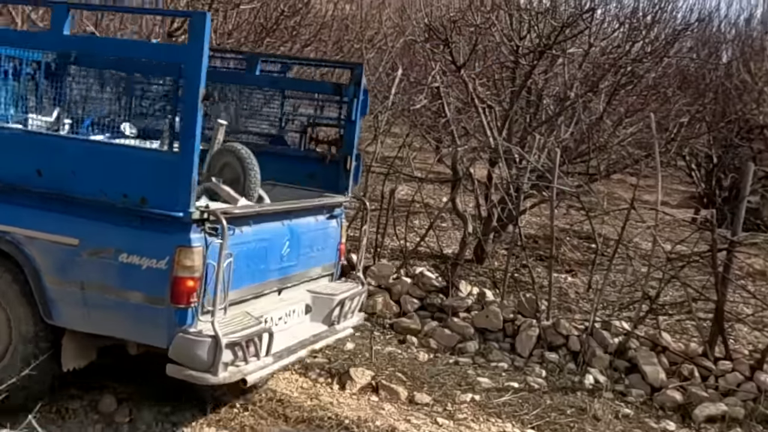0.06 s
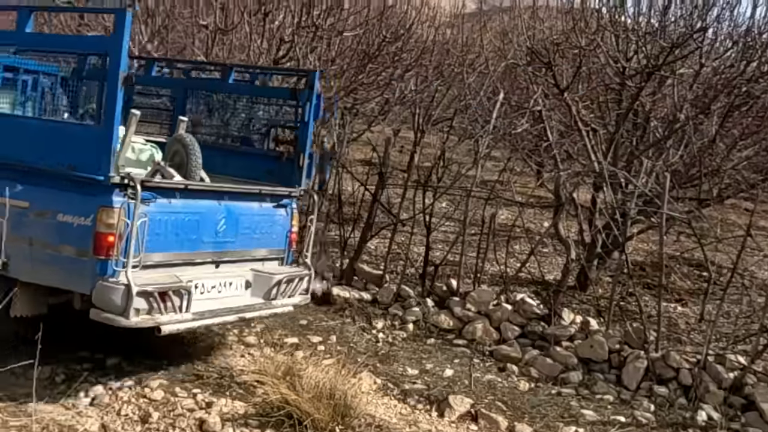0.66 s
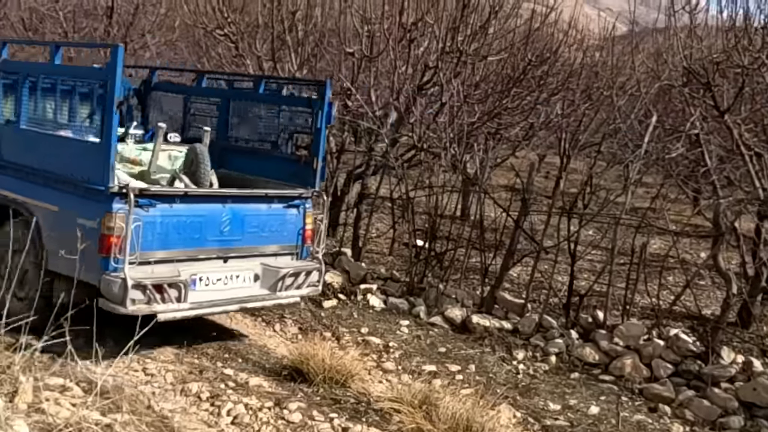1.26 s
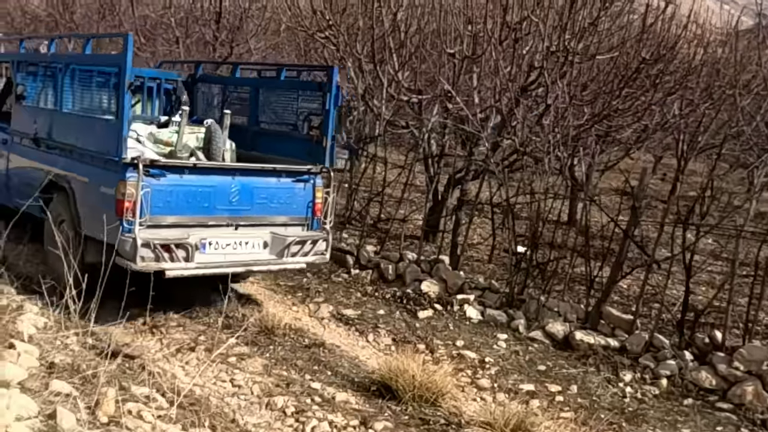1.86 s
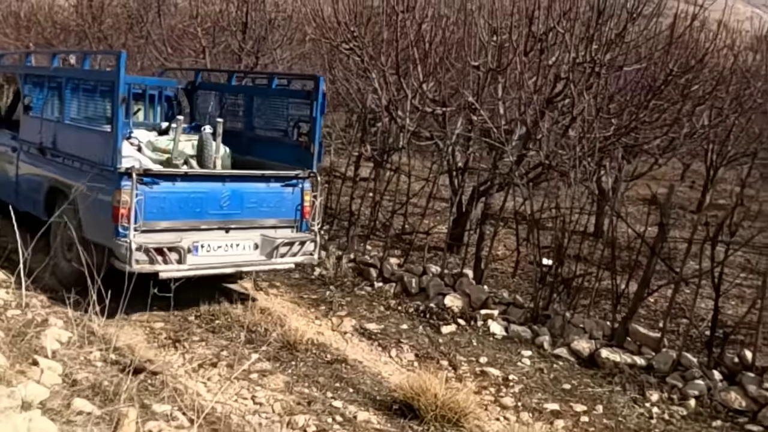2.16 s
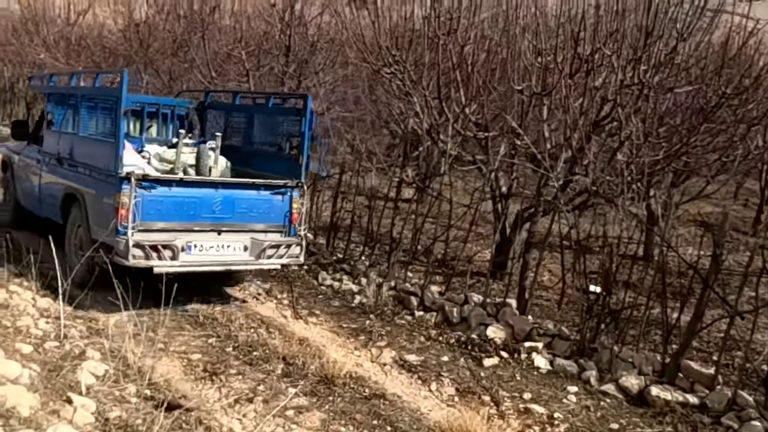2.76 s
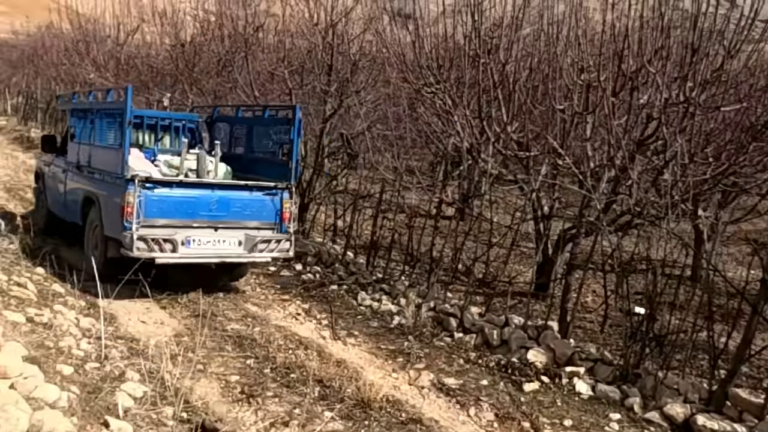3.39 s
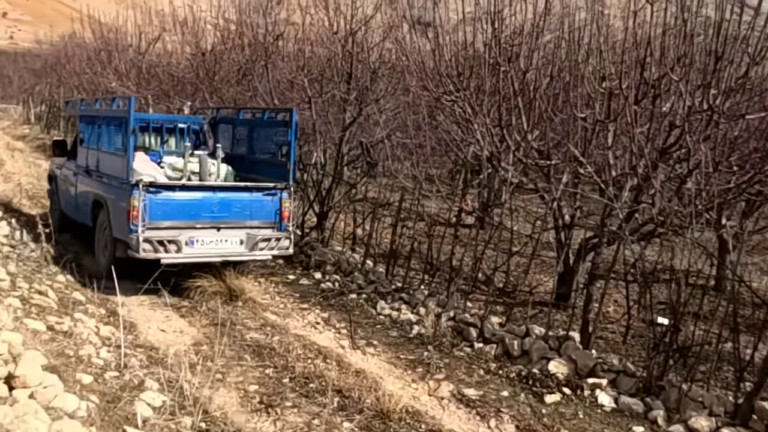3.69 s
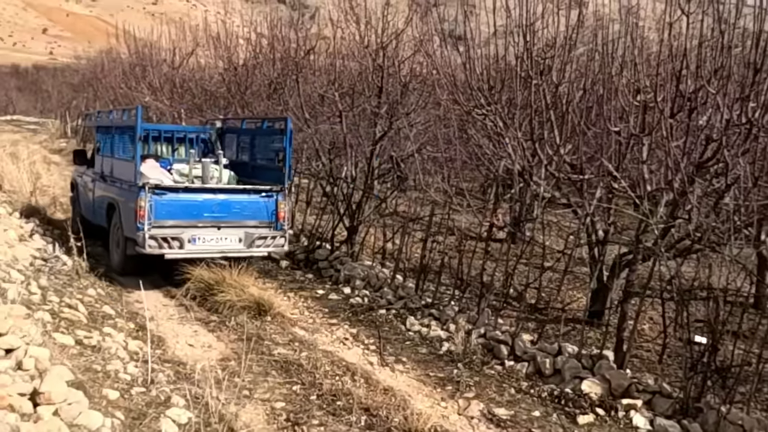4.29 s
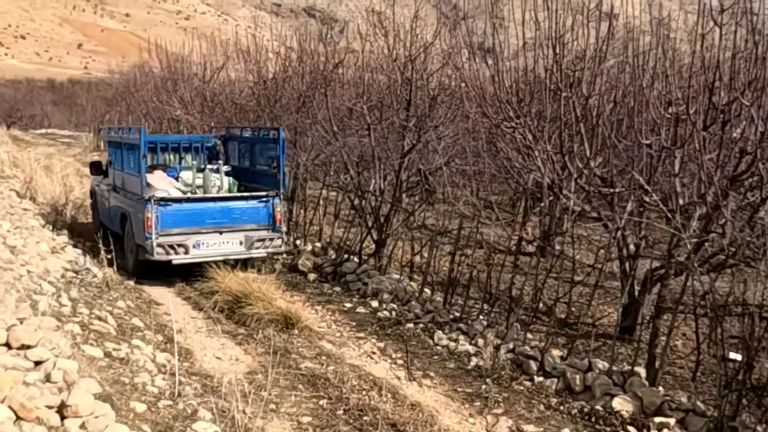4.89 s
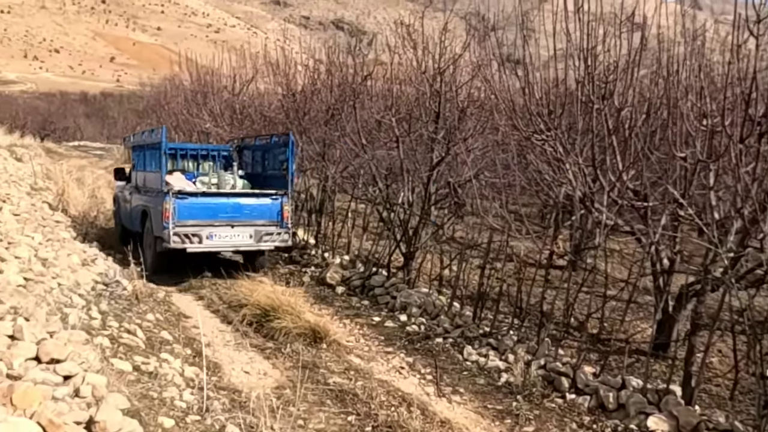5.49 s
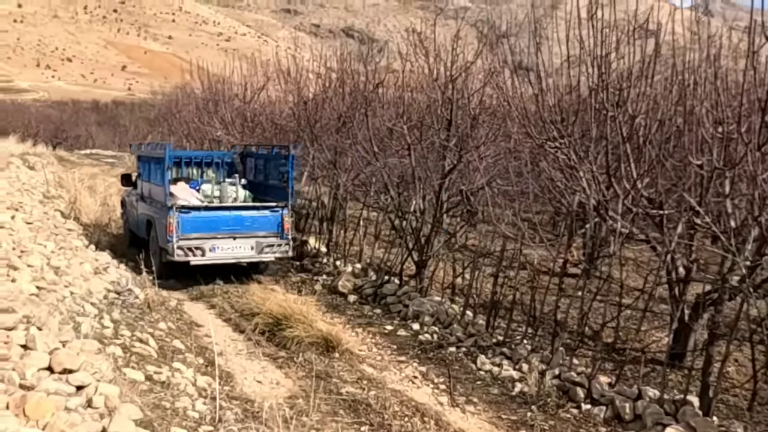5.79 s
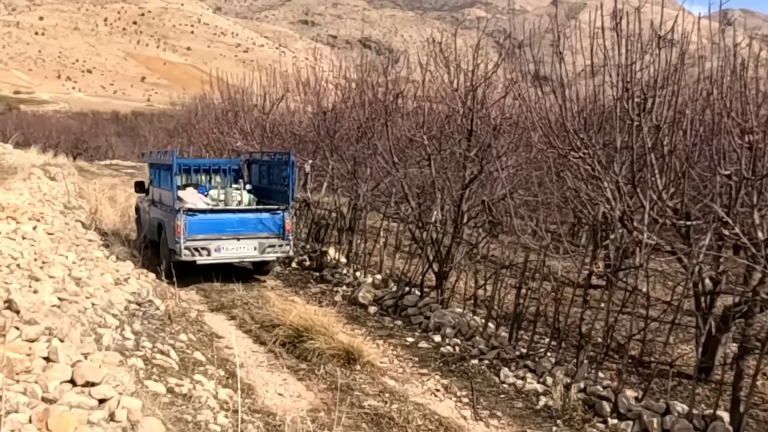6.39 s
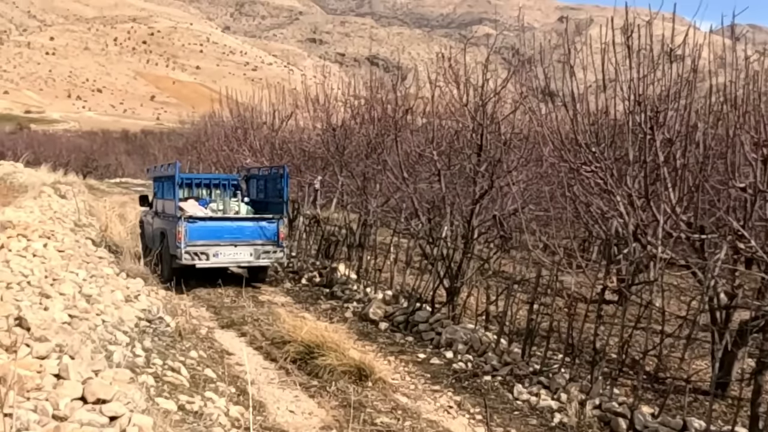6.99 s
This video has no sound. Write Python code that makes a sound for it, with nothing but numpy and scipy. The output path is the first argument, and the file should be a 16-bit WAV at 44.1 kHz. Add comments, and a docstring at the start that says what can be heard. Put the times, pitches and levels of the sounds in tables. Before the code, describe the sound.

An old pickup pulls slowly away from the microphone on a stony outdoor track, with very little echo. Its low, throbbing exhaust runs throughout, with light engine clatter, a body drone and tyres crunching on grit. The revs are slightly raised at first and ease to idle by about 3 seconds, while the truck gradually grows fainter.

In the first 0.6 seconds the load bed knocks, rattles and groans. More knocks and small creaks come around 1.5 seconds, and a sharp knock at 2.7. A dry spring squeaks briefly at 3.3 seconds, then more faintly near 4 and 4.4. At 5.3 seconds a bigger bump brings a squeak, a low suspension thump, a shudder and a burst of snapping stones. A small steel part pings at 5.7. Faint rattles and stone snaps continue over the idling engine until about 7 seconds.

```python
"""An old pickup's exhaust throbs as it rolls away down a stony orchard track, easing off to idle. Each firing
of the engine sends a puff down the pipe, which boosts some tones and muffles others. Behind it the engine
clatters, the fan hums, the body drones and the tyres crunch over grit. Bumps make the load bed knock, shudder
and creak and a dry spring squeak; low thumps sound, then a deep throb as the engine stumbles. One small steel
part rings, and trees and stones scatter a little of the sound."""
import sys
import numpy as np
from scipy import signal
from scipy.fft import rfft, irfft, next_fast_len
from scipy.io import wavfile
from scipy.ndimage import uniform_filter1d, map_coordinates

SR = 44100
rng = np.random.default_rng(int(sys.argv[2]) if len(sys.argv) > 2 else 0)


def transcribe(u):
    """Save the signal u as a 16-bit wav file named by the first command-line argument.

    u: samples, shape (n,) or (channels, n), limited to [-1, 1]; the rate is SR.
    q: integer samples, one column per channel.
    """
    v = np.clip(np.atleast_2d(u).T, -1, 1)
    q = np.round(v * 32767).astype(np.int16)
    wavfile.write(sys.argv[1], SR, q)


N = 310905
TIME = np.arange(N) / SR


def gain_of(db):
    """Turns decibels into a number to multiply by."""
    return 10 ** (np.asarray(db) / 20)


def evened(x):
    """Scales x to an average power of 1."""
    return x / np.sqrt(np.mean(x ** 2) + 1e-20)


def read(points, hz):
    """Looks up a table's value at any pitch."""
    pitches, values = np.transpose(points)
    return np.interp(np.log(hz + 1), np.log(pitches + 1), values)


def add(mix, start_s, sound):
    """Mixes a sound in at the given time."""
    start = round(start_s * SR)
    sound = sound[max(-start, 0):]
    part = mix[max(start, 0):][:len(sound)]
    part += sound[:len(part)]


def filtered(x, response):
    """Multiplies each pitch in x by response(hz)."""
    size = next_fast_len(len(x) + 4096)
    return irfft(rfft(x, size) * response(np.fft.rfftfreq(size, 1 / SR)), size)[..., :len(x)]


def coloured(x, spectrum):
    """Shapes x by rows of (pitch_hz, level_db), at power 1."""
    return evened(filtered(x, lambda hz: gain_of(read(spectrum, hz))))


def noise(size, spectrum):
    """Random noise with the given tone colour."""
    return coloured(rng.standard_normal(size), spectrum)


def wander(rate_hz, step=1):
    """A smooth random drift, given at every step-th sample."""
    slow = TIME[::64]
    drift = evened(map_coordinates(rng.standard_normal(1024), [slow * rate_hz * 2], mode="wrap"))
    return np.interp(TIME[::step], slow, drift)


def patchy(x, depth_db, bands, frames=7):
    """Patches of pitch swell and fade as the contacts change."""
    slices = signal.stft(x, SR, nperseg=512)[2]
    patches = uniform_filter1d(rng.standard_normal(slices.shape), bands, axis=0)
    patches = evened(uniform_filter1d(patches, frames, axis=1))
    return evened(signal.istft(slices * gain_of(depth_db * patches), SR, nperseg=512)[1][:N])


def distance_db(time_s, start_m=4.54, metres_per_s=1.064):
    """The truck fades as it leaves at walking pace."""
    return -20 * np.log10(1 + metres_per_s * time_s / start_m)


# How far the left side's wave runs ahead of the right: pitch_hz, lead_radians
LEFT_LEAD = [(1050, 0), (1700, -.5), (3100, -1.65), (4000, -.7), (4800, .05), (5500, .15), (7700, -.6),
             (10000, -.2), (11000, -1.3), (13500, -1.3)]
# How much louder the left side is: pitch_hz, level_db
LEFT_BOOST = [(330, 0), (570, -1.6), (1000, .2), (1550, 2.6), (2250, 2.8), (2850, 0), (3600, -4.5),
              (4750, -4.5), (5400, 0), (6500, 3.4), (9300, 1), (10700, 6), (12000, 3)]
# What trees and stones throw back: pitch_hz, level_db
ECHO_COLOUR = [(70, -42.5), (160, -68.5), (350, -15.5), (1000, -20.5), (2500, -10.5), (4000, -14.5),
               (6000, -6), (12000, -2)]
def orchard(x, fade_s=0.16):
    """Sound arrives a little differently left and right, followed by faint echoes."""
    def left_over_right(hz):
        return gain_of(read(LEFT_BOOST, hz)) * np.exp(1j * read(LEFT_LEAD, hz))
    direct = filtered(x, lambda hz: left_over_right(hz) ** np.array([[.5], [-.5]]))
    echoes = rng.standard_normal((2, SR // 4)) * gain_of(-60 * TIME[:SR // 4] / fade_s)
    echoes /= np.linalg.norm(echoes, axis=1, keepdims=True)
    scattered = filtered(x, lambda hz: gain_of(read(ECHO_COLOUR, hz)))
    return direct + signal.oaconvolve(scattered[None], echoes, axes=1)[:, :N]


# Rough patches of track: middle_s, length_s, chassis_swell_db, grit_swell_db
RUTS = [(1.8, 1.6, 1.4, 1.5), (2.59, 0.32, 3, -1), (3.32, 1.3, 3.5, 5), (4.898, 0.23, 3.5, 2),
        (5.346, 0.3, 6.5, 16), (5.828, 1.38, 4, 4.5), (6.273, 0.24, 3.5, 3), (6.716, 1.1, 4.5, 6)]
def ruts():
    """Each rough patch gives the chassis and the grit one smooth swell in level."""
    chassis_db, grit_db = np.zeros((2, N))
    for middle_s, length_s, chassis_swell_db, grit_swell_db in RUTS:
        arch = np.hanning(int(length_s * SR))
        add(chassis_db, middle_s - length_s / 2, chassis_swell_db * arch)
        add(grit_db, middle_s - length_s / 2, grit_swell_db * arch)
    return chassis_db, grit_db


# The crunch under the tyres: pitch_hz, level_db
GRIT_COLOUR = [(500, -10), (1500, 6), (3300, -0.5), (4800, 1), (6400, -1.5), (7800, -6), (8400, -8.5),
               (10200, -12.5), (11400, -22), (14000, -29.5), (16000, -39)]
def grit(firings, level_db, cracks_per_s=1200):
    """Tiny stones crack over a hiss that pulses with the engine; both come in clumps."""
    sizes = gain_of(3.6 * np.minimum(rng.exponential(1, N), 4)) * rng.choice([-1, 1], N)
    cracks = evened(sizes * (rng.random(N) < cracks_per_s / SR))
    hiss = .81 * rng.standard_normal(N) * np.exp(.5 * np.cos(2 * np.pi * firings))
    clumps = gain_of(1.7 * wander(45))
    crunch = coloured((cracks + hiss) * clumps, GRIT_COLOUR)
    return gain_of(level_db) * patchy(crunch, depth_db=2.4, bands=7)


# The drone of the truck's body: pitch_hz, level_db
RUMBLE_COLOUR = [(60, -2), (150, 1), (260, 2), (350, 0.5), (410, -6.5), (520, -11), (780, -15.5),
                 (1200, -18), (3000, -60)]
def rumble(level_db):
    """Rolling wheels make the body drone."""
    return gain_of(level_db + .5 * wander(5.7)) * noise(N, RUMBLE_COLOUR)


# Groans and creaks of the cargo frame: middle_s, length_s, level_db, pitch_hz
CREAKS = [(.28, .7, -46, 435), (.32, .18, -41, 345), (1.512, .024, -38, 2230), (1.514, .022, -44, 2780),
          (1.545, .07, -43, 2160), (1.559, .04, -39.5, 1030), (1.591, .035, -45, 2480),
          (2.557, 0.1, -46, 1322), (3.075, .06, -49, 2340), (3.187, 0.016, -40, 2140),
          (6.419, 0.12, -54.5, 3050), (6.838, 0.086, -52, 2012)]
def creaks(mix):
    """A panel sings near one wavering pitch, chopped up by uneven slips."""
    unsteady = [(100, 0), (300, -6), (900, -40)]
    for middle_s, length_s, level_db, hz in CREAKS:
        size = int(length_s * SR)
        waver = noise(SR, unsteady)[:size]
        slips = np.exp(.45 * noise(SR, unsteady)[:size])
        tone = np.sin(2 * np.pi * np.cumsum(hz * (1 + .026 * waver)) / SR)
        add(mix, middle_s - length_s / 2, gain_of(level_db) * evened(tone * slips) * np.hanning(size))


def ring(level_db, hz, fade_s):
    """One struck tone that drops 60 dB in fade_s."""
    t = TIME[:SR]
    return gain_of(level_db - 60 * t / fade_s) * np.sin(2 * np.pi * hz * t)


# The tones of a small steel part: pitch_hz, offset_db, fade_s
STEEL_TONES = [(1850, -5, .04), (2830, -1.5, .04), (4030, -8, .035), (6045, -26, .25), (7750, 0, .15),
               (10425, -12, .1), (11920, -38, .4), (12080, -38, .4), (13580, -26, .11)]
def steel_ping(mix, start_s=5.7155, level_db=-26.5):
    """One blow sets all the steel's tones ringing."""
    for hz, offset_db, fade_s in STEEL_TONES:
        add(mix, start_s, ring(level_db + offset_db, hz, fade_s))


# Where the spring rings best: pitch_hz, level_db
SPRING_COLOUR = [(450, -20), (900, -9), (1400, -8), (1840, 1), (2100, -8), (2330, 1), (2700, -8), (2790, 2),
                 (3200, -16), (3620, -5), (3730, -16), (4150, -14), (4600, -6), (5100, -15), (5500, -6),
                 (6400, -17), (7400, -24), (8500, -36)]
# Squeaks: start_s, length_s, level_db, pitch_hz, glide_share, rasp_0_to_1, stutter_0_to_1,
# brightness_db_per_octave
SQUEAKS = [(3.258, .027, -28.3, 1000, .06, .2, .1, -.8), (3.283, .033, -31, 1002, -.015, .02, 0, -3),
           (3.959, .04, -35.7, 910, .025, .8, .85, .3), (4.438, .022, -42.5, 918, -.02, .8, .3, .7),
           (5.298, .036, -29.5, 932, -.04, 1, .25, 2.3)]
def squeaks(mix):
    """A dry spring sticks and slips; harder rubbing brings out overtones that flare one by one."""
    for start_s, length_s, level_db, hz, glide, rasp, stutter, brightness in SQUEAKS:
        size = int(length_s * SR)
        waver = .017 * np.sqrt(rasp) * noise(4096, [(120, 0), (400, -14), (1200, -50)])[:size]
        cycles = np.cumsum(hz * (1 + glide * np.linspace(-.5, .5, size) + waver)) / SR
        midway = stutter * np.hanning(size) ** 2  # strong and weak slips by turns add in-between tones
        tones = 0
        for multiple in np.arange(2, 18) / 2:
            unsteady = noise(8192, [(70, 0), (200, -10), (600, -26), (2000, -60)]).reshape(2, -1)
            flare, jitter = unsteady[:, :size] * np.sqrt(rasp) * min(multiple / 2, 1)
            strength = (midway if multiple % 1 else 1) * rasp ** np.log10(multiple ** 2)
            strength *= gain_of(brightness * np.log2(multiple) + 6 * np.tanh(flare))
            smear = multiple ** 2  # the spring delays each overtone differently
            tones += strength * np.sin(2 * np.pi * multiple * cycles + smear + .45 * jitter)
        scrape = np.pad(tones * signal.windows.tukey(size, .5), (0, 2048))

        def spring(f):
            ring_on = 1 + 3 * rasp / (1 + 1j * (f - hz) / 18)  # the lowest tone lingers
            return gain_of(read(SPRING_COLOUR, f)) * ring_on
        sound = filtered(scrape, spring)
        add(mix, start_s, gain_of(level_db) * sound / np.sqrt(np.sum(sound ** 2) / (.66 * size)))


# Low thumps, then a deep throb as the engine stumbles: start_s, level_db, pitch_hz, fade_s
THUMPS = [(3.148, -35, 295, 0.14), (5.332, -16.5, 86, 0.24), (5.348, -29, 232, 0.11),
          (5.6, -24.5, 34.7, 0.47), (5.72, -36, 29, 0.81)]
def thumps(mix):
    """Each thump rings on one low tone."""
    for start_s, level_db, hz, fade_s in THUMPS:
        add(mix, start_s, ring(level_db, hz, fade_s))


# The rattle of loose panels and load: pitch_hz, level_db
RATTLE_COLOUR = [(100, 4), (400, -5.5), (750, -2), (1300, 3), (2300, 2.5), (3300, -4), (6400, -7.5),
                 (8500, -15), (10500, -23.5), (11700, -40), (14300, -41), (16000, -50)]
# How long they take to drop 60 dB: pitch_hz, fade_s
RATTLE_FADE = [(300, 0.49), (1400, 0.25), (3000, 0.14), (7000, 0.063), (14000, 0.099)]
def rattle(mix, peak_s, level_db, rise_s, brightness, lead_s=.1):
    """Many small contacts swell and die away, the treble first."""
    size = SR // 3
    hiss = rng.standard_normal(size)
    grains = np.exp(.27 * rng.standard_normal(size).repeat(32)[:size])
    hz, t, slices = signal.stft(evened(hiss * grains), SR, nperseg=256)
    colour = evened(gain_of(read(RATTLE_COLOUR, hz) + brightness * np.log2(np.maximum(hz, 500) / 2200)))
    fade = gain_of(-60 * np.maximum(t - lead_s, 0) / read(RATTLE_FADE, hz)[:, None])
    sound = signal.istft(slices * colour[:, None] * fade, SR, nperseg=256)[1][:size]
    swell = np.exp(np.minimum(TIME[:size] - lead_s, 0) / rise_s)
    add(mix, peak_s - lead_s, gain_of(level_db) * sound * swell)


# Jolts of the load bed: peak_s, level_db, rise_s, brightness_db_per_octave
SHUDDERS = [(.004, -37, .0045, 8.5), (.021, -30.5, .002, -7), (0.046, -37.5, 0.0021, 7),
            (.094, -34, 0.0048, -3), (0.156, -41.5, .006, 2.5), (.246, -47, .003, 1),
            (.281, -36, 0.0028, 0), (.299, -33, 0.006, 1), (.311, -31, .005, -3),
            (.524, -41.5, 0.0035, 0.5), (.82, -48, 0.013, 2), (1.387, -38, 0.0033, -6),
            (1.556, -36.5, 0.01, -4), (1.597, -38.5, 0.017, -5), (1.71, -38, .008, -14),
            (2.35, -42, 0.011, 1), (2.673, -41, 0.0082, 6.5), (2.914, -32, 0.014, -1),
            (3.408, -31.5, 0.0058, 2), (4.68, -46.5, 0.0067, -2), (4.798, -41, 0.013, -2),
            (4.925, -48.5, 0.011, 2), (5.175, -45.5, 0.0089, 0.5), (5.255, -43.5, .01, -1.5),
            (5.342, -30.5, 0.031, -9.5), (5.678, -37.5, 0.017, -4.5), (5.719, -39, 0.0021, -1.5),
            (5.775, -37.5, .0074, -11), (5.86, -41, 0.012, -8), (6.07, -46.5, .018, -0.5),
            (6.215, -48, 0.016, 0.5), (6.28, -48, .015, -3), (6.68, -50, 0.0099, 6), (6.825, -45, .008, -2)]
def shudders(mix):
    """The bed rattles over a stone, then the load settles, softer and duller."""
    for peak_s, level_db, rise_s, brightness in SHUDDERS:
        rattle(mix, peak_s, level_db, rise_s, brightness)
        rattle(mix, peak_s + .027, level_db - 7.5, rise_s=.0091, brightness=brightness - 8.5)


def tap(level_db, hz, rise_cycles, tail, tail_s):
    """A blow that dies at once, with a short scatter behind it."""
    t = TIME[:2048]
    age = t * hz / rise_cycles
    blow = age * np.exp(1 - age) * np.sin(2 * np.pi * hz * t)
    echoes = rng.standard_normal(len(t)) * np.exp(-t / tail_s) * np.sqrt(hz / SR)
    return gain_of(level_db) * (blow + tail * signal.fftconvolve(blow, echoes)[:len(t)])


def by_chance(per_s, level_db, hz, spread_db=3, octaves=0.22):
    """Random rows of (start_s, level_db, pitch_hz), fainter with distance."""
    draws = rng.random((64, 3))
    times = np.cumsum(2 * draws[:, 0]) / per_s
    return [(s, level_db + distance_db(s) + spread_db * size, hz * 2 ** (octaves * pitch))
            for s, (size, pitch) in zip(times, 2 * draws[:, 1:] - 1) if s < N / SR]


# Sharp snaps of grit: start_s, level_db, pitch_hz
SNAPS = [(.508, -25.5, 3450), (2.491, -31, 5670), (3.15, -36.5, 6000), (3.871, -39, 5850),
         (4.064, -40, 6040), (4.088, -48, 6500), (4.618, -43, 4500), (4.8044, -45, 3800),
         (5.1643, -39, 5640), (5.295, -24.5, 7460), (5.3097, -31, 8600), (5.3517, -26.5, 7840),
         (6.518, -33, 5760), (6.591, -39, 4400)]
def snaps(mix):
    """Single stones snap under a tyre, with faint extra ones at random."""
    for start_s, level_db, hz in SNAPS + by_chance(per_s=1.4, level_db=-37, hz=5600):
        add(mix, start_s, tap(level_db, hz, rise_cycles=.59, tail=.3, tail_s=.0039))


# Dry knocks from the bed: start_s, level_db, pitch_hz
KNOCKS = [(0.0182, -19, 1420), (0.0956, -21, 1550), (0.3101, -20.5, 2200), (.334, -27, 1400),
          (.347, -27, 1520), (.576, -24, 1450), (.584, -21.5, 1240), (1.386, -32, 1320), (1.542, -24, 1470),
          (1.578, -29, 1450), (1.602, -31, 1280), (2.35, -25.5, 2060), (2.6807, -16, 1600),
          (2.6824, -24, 1800), (4.089, -34, 1360), (4.297, -36.5, 1300), (4.345, -43, 1700),
          (4.618, -39, 576), (4.803, -35, 1450), (5.178, -35, 1200), (5.537, -33.5, 1300),
          (5.546, -30.5, 1270), (5.85, -29.5, 1490), (5.861, -34, 1100)]
def knocks(mix):
    """The bed knocks on the bumps, with faint extra knocks at random."""
    for start_s, level_db, hz in KNOCKS + by_chance(per_s=2.3, level_db=-35, hz=1420):
        add(mix, start_s, tap(level_db, hz, rise_cycles=.65, tail=.12, tail_s=.0094))


def fan(firings, level_db, cycles_per_firing=2.73):
    """The belt-driven fan hums between the exhaust's tones and beats against them."""
    loudness = gain_of(level_db + 2 * wander(3))
    return loudness * evened(np.sin(2 * np.pi * cycles_per_firing * firings + .5 * wander(3)))


# The clatter of engine and chassis: pitch_hz, level_db
CLATTER_COLOUR = [(300, -19), (700, -13.5), (1050, 1), (1500, 2.5), (1900, 2.5), (2200, 0), (2750, -1),
                  (3300, -7.5), (5000, -19.5), (9000, -25), (15000, -69)]
def clatter(firings, level_db, octaves_per_s=0.026):
    """Moving parts make a noise that is a little stronger at each firing."""
    beat = np.exp(.26 * np.cos(2 * np.pi * firings) + .08 * np.cos(4 * np.pi * firings))
    hz, t, slices = signal.stft(beat * rng.standard_normal(N), SR, nperseg=512)
    slide = 2 ** (octaves_per_s * (t - t.mean()))  # rises as the bounce off the ground flattens
    colour = gain_of(read(CLATTER_COLOUR, hz[:, None] / slide))
    sound = signal.istft(slices * colour, SR, nperseg=512)[1][:N]
    sound = patchy(sound, depth_db=1.7, bands=3)
    return gain_of(level_db + 1.4 * wander(14)) * sound


# The rush of gas at the tailpipe: pitch_hz, level_db
GAS_COLOUR = [(10, -20), (28, -3), (60, 9.5), (110, 5.5), (165, 7.5), (200, 5.5), (240, -2.5), (320, -12),
              (450, -28.5), (1000, -61.5)]
def gas(level_db):
    """Swirling gas fills in between the exhaust's tones."""
    return gain_of(level_db) * noise(N, GAS_COLOUR)


# What the pipe and silencer let through: pitch_hz, level_db
PIPE_COLOUR = [(20, -9), (39, 2), (48, 3.5), (79, -10.5), (93, -9.5), (122, 0.5), (131, -9), (142, -14),
               (158, -29), (172, -22.5), (187, -14), (198, -9.5), (220, -24), (240, -28), (270, -27),
               (320, -40.5), (400, -44), (650, -64)]
def exhaust(firings, firing_hz, throttle, gain_db, step=16):
    """One puff a firing; its tones swell as they slide through the pitches where the pipe rings."""
    firings, firing_hz, throttle = firings[::step], firing_hz[::step], throttle[::step]
    angle = 2 * np.pi * firings + .037 * wander(5.4, step)
    burn = .039 * wander(14, step)  # no two firings burn alike
    uneven = .05 + .018 * np.sqrt(throttle)
    puffs = 0
    for multiple in np.arange(1, 23) / 2:
        highness = np.clip(np.log(multiple) / np.log(5), 0, 1)
        sharpen_db = 7 * throttle * highness  # throttle sharpens the puff
        strength = gain_of(read(PIPE_COLOUR, multiple * firing_hz) + sharpen_db)
        strength *= 1 + highness * (burn + .046 * (1 + throttle) * wander(8.3, step))
        if multiple % 1:  # unequal cylinders add in-between tones
            strength *= uneven * min(multiple, 4.5)
        # the silencer spreads each puff out in time
        smear = .1537 * (multiple - 1) ** 2 + 1.12 * throttle * (multiple - 1)
        puffs -= strength * np.cos(multiple * angle + smear)
    puffs *= gain_of(.42 * wander(4, step))  # the tailpipe bobs over the ground
    return gain_of(gain_db) * signal.resample_poly(puffs, step, 1)[:N]


# Engine speed: time_s, firings_per_s
ENGINE_SPEED = [(0, 46.3), (.35, 47.45), (.95, 45.6), (1.2, 43.9), (1.7, 43.8), (1.95, 42.5), (2.45, 41.3),
                (2.85, 39.85), (4.2, 39.45), (5.65, 39.3), (5.85, 38.7), (6.1, 39.55), (6.4, 39.8),
                (7.05, 39.7)]
def scene(idle_hz=39.92, rev_range_hz=6.94, turn_s=2.94):
    """Engine speed, distance and ruts set the running sounds' levels; the bumps go on top."""
    firing_hz = np.interp(TIME, *np.transpose(ENGINE_SPEED))
    firings = np.cumsum(firing_hz) / SR
    throttle = np.clip((firing_hz - idle_hz) / rev_range_hz, 0, 1)
    far_db = distance_db(TIME)
    chassis_db, grit_db = ruts()
    # the truck starts side-on, tailpipe facing away, then straightens onto the track
    pipe_db = far_db - 3.5 * np.maximum(1 - (TIME / turn_s) ** 2, 0)
    mix = exhaust(firings, firing_hz, throttle, -19.5 + pipe_db)
    mix += gas(-31.5 + pipe_db)
    mix += fan(firings, -40 + far_db)
    mix += clatter(firings, -46.5 + far_db + 4.5 * throttle + chassis_db)
    mix += rumble(-42 + far_db + 8 * throttle + .35 * chassis_db)
    mix += grit(firings, -53 + far_db + 1.8 * throttle + grit_db)
    for play in (shudders, knocks, snaps, squeaks, creaks, thumps, steel_ping):
        play(mix)
    return orchard(mix)


def record(dry, cutoff_hz=15650):
    """Cuts off the very highest treble."""
    treble_cut = signal.firwin(511, cutoff_hz, window=("kaiser", 9), fs=SR)
    return signal.oaconvolve(dry, treble_cut[None], "same")


dry = scene()
out = record(dry)
transcribe(out)
```